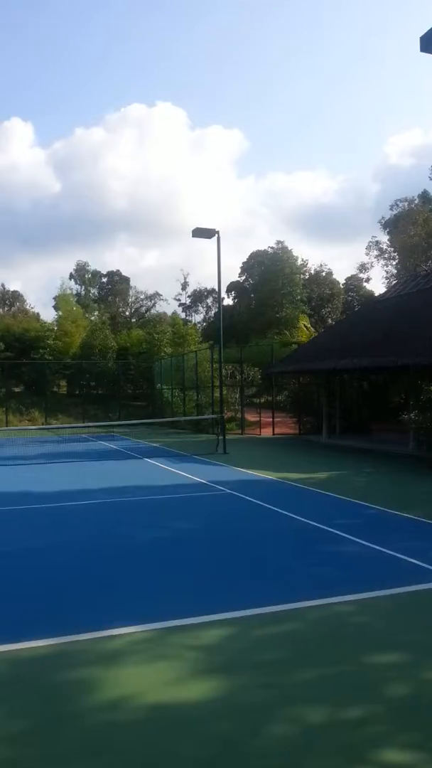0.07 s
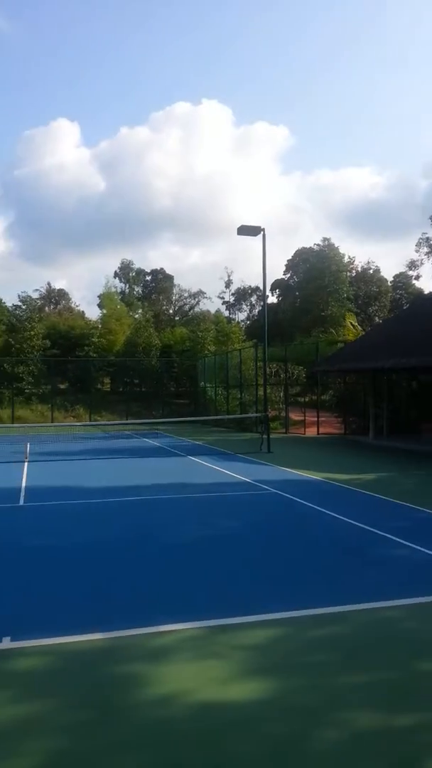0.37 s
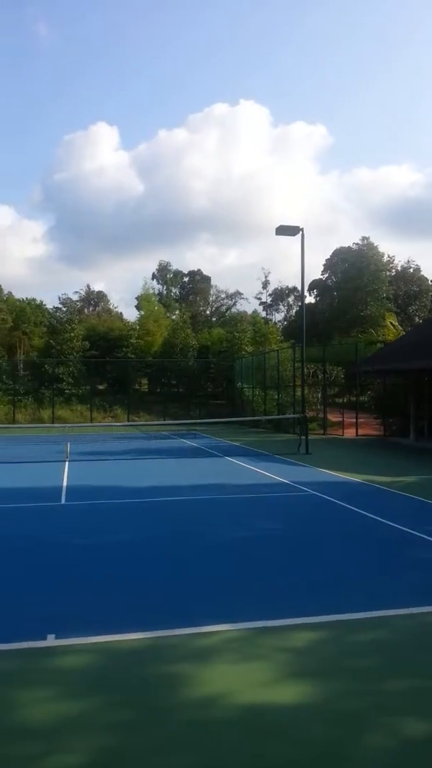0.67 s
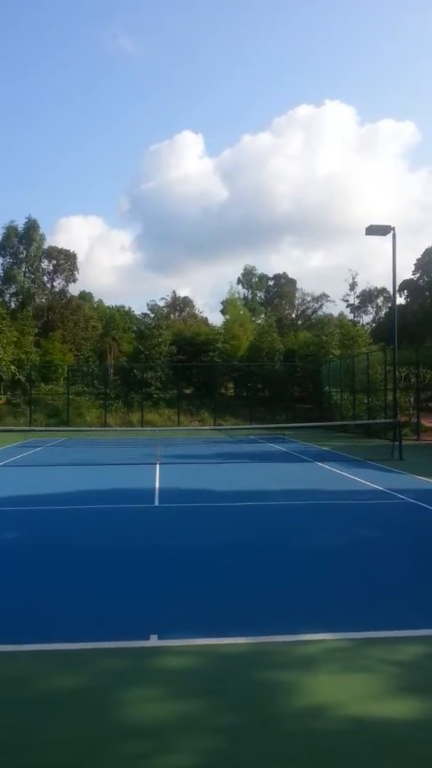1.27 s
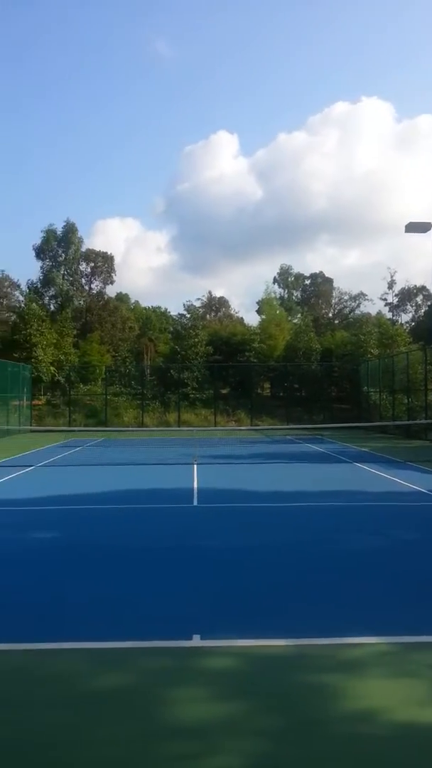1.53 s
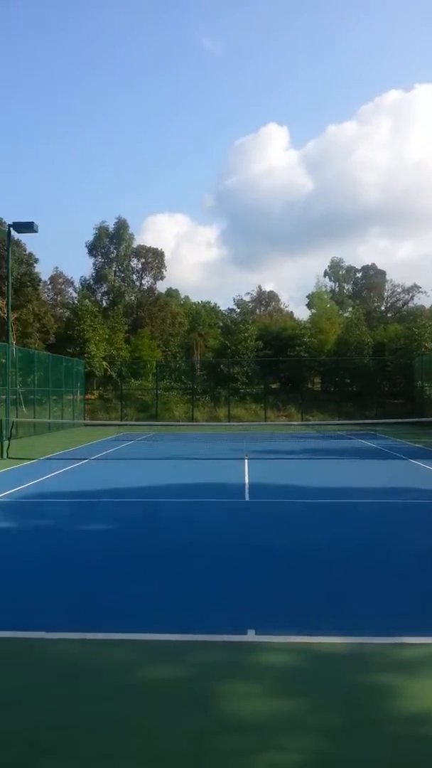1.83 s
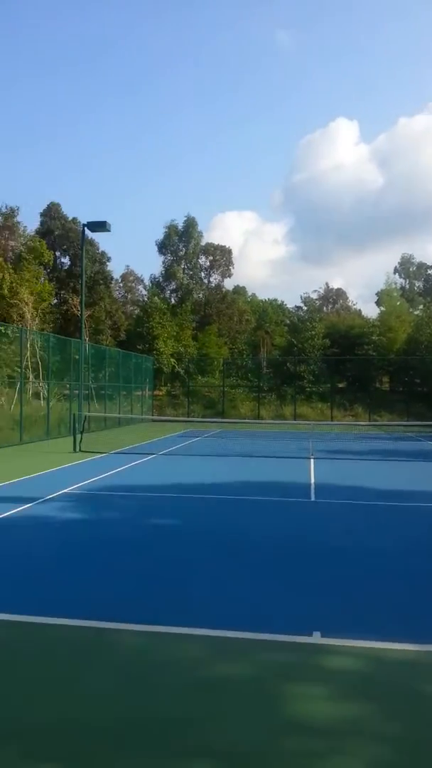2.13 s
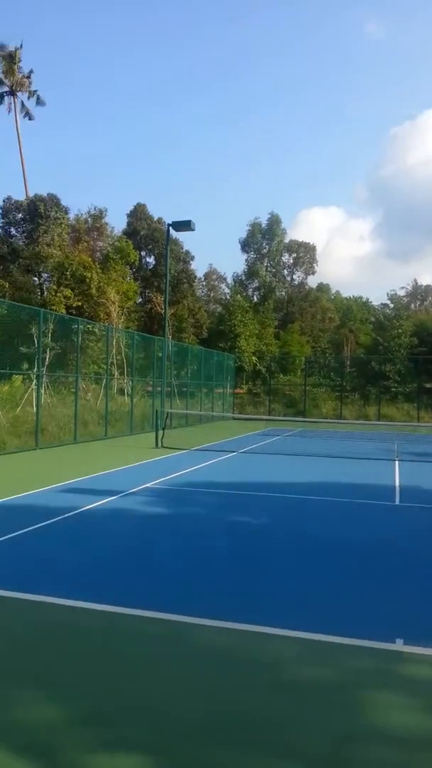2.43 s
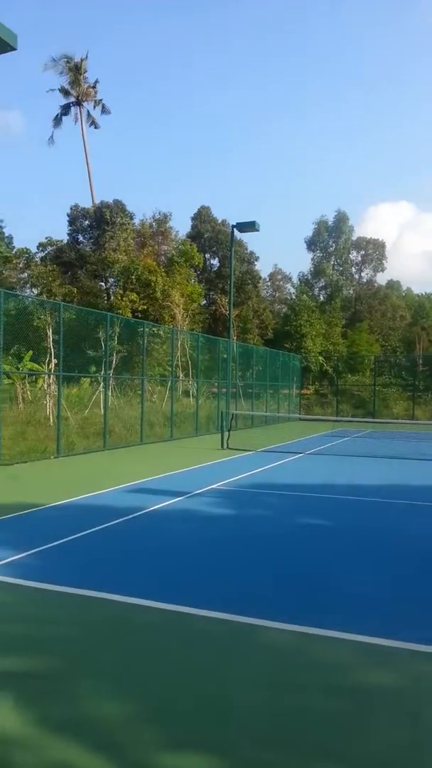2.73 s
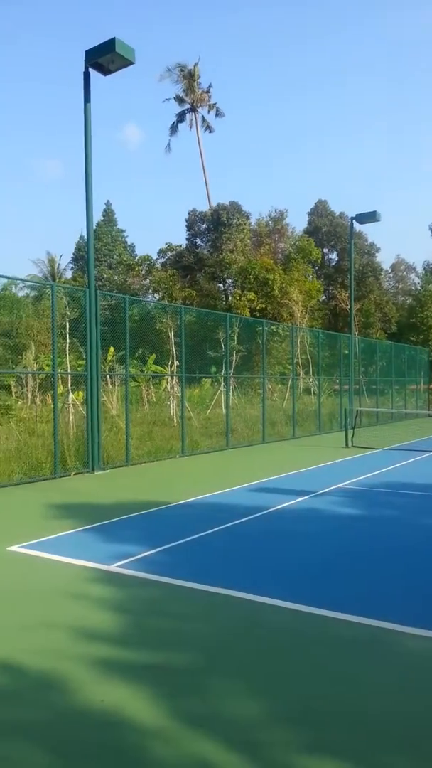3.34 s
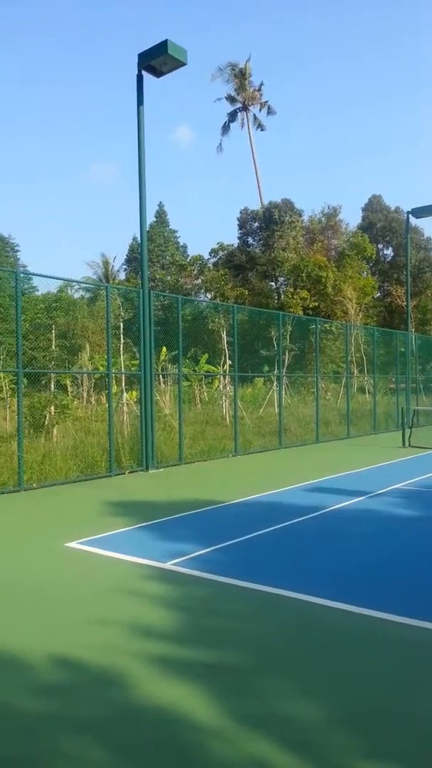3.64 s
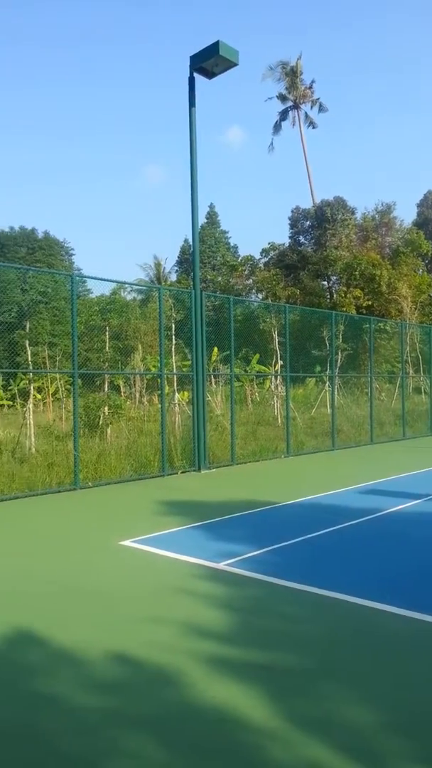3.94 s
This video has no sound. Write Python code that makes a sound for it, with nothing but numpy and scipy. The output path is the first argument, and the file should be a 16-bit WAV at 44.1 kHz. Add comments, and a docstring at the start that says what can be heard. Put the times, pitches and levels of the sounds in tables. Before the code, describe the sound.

Cicadas sing without a break around an open-air court, lower on the left and shriller on the right. Light ticks and a brief shoe scuff sound close by before one cicada rises, all over a faint hum.

```python
"""An outdoor court among trees. Cicada choruses sing, the lower ones left, the shrill ones right:
tymbal clicks ring the insects' bodies and scatter through the foliage. One closer cicada joins late,
and far insects call in waves. Close by come dry ticks, one short scuff and a few soft bumps, as of
someone turning on the spot. A faint machine hum lies under the outdoor air and the fizz of the wood."""
import sys
import numpy as np
from scipy import signal
from scipy.fft import rfft, irfft
from scipy.io import wavfile
from scipy.ndimage import uniform_filter1d, map_coordinates

SR = 44100
rng = np.random.default_rng(int(sys.argv[2]) if len(sys.argv) > 2 else 0)


def generate_wav(sig):
    """Save sig (samples, or channels by samples) to the path in sys.argv[1] as 16-bit PCM at SR."""
    pcm = np.round(np.clip(np.atleast_2d(sig).T, -1, 1) * 32767).astype(np.int16)
    wavfile.write(sys.argv[1], SR, pcm)


N = 176400
TIME, FREQ = np.arange(N) / SR, np.fft.rfftfreq(N, 1 / SR)


# Chorus voices: pitch_hz, width_hz, gain_db, left_over_right_db, coherence, left_lead_rad
DEEP_VOICE = (4461, 718, -3, 7.5, 0.25, 1.5)
LOW_VOICE = (4987, 1002, 1, 7.5, 0.16, 4)
MIDDLE_VOICE = (5480, 621, -7, 15, 0.5, 2)
UPPER_VOICE = (6105, 1700, 0.35, 1.1, 0.44, 2.16)
MAIN_VOICE = (6686, 875, 0, -14, 0.42, 3.5)
HIGH_VOICE = (7544, 829, -1.5, -9.5, 0.43, -3.5)
SHRILL_VOICE = (8522, 676, -15.5, -10, 0.7, 2)  # upper resonance of the high chorus
# Chorus swells, before the voice's gain: time_s, level_db
DEEP_SWELL = [(0, -63), (.5, -72), (.82, -62), (1.1, -65), (1.4, -64), (1.85, -75), (2.3, -77), (2.8, -61),
              (3.1, -63), (3.35, -56.5), (3.7, -59), (4, -61)]
LOW_SWELL = [(0.0, -59.5), (0.3, -55), (0.62, -55.5), (0.92, -53), (1.3, -55.5), (1.57, -52.5), (1.85, -55),
             (2.08, -52), (2.3, -51.5), (2.52, -54), (2.95, -55), (3.35, -55), (3.7, -55.5), (4.0, -51)]
MIDDLE_SWELL = [(0.0, -58), (0.33, -44.5), (0.6, -54.5), (1.0, -52), (1.5, -60), (1.85, -60), (2.25, -74),
                (2.6, -50), (2.95, -62), (3.4, -46), (3.7, -48), (4.0, -48)]
UPPER_SWELL = [(0.0, -53.5), (0.3, -55.5), (0.7, -55), (1.1, -52), (1.4, -52), (1.85, -52.5), (2.25, -50),
               (2.6, -53), (2.95, -55), (3.35, -55.5), (3.7, -52.2), (4.0, -52)]
MAIN_SWELL = [(0.0, -50.5), (0.25, -49), (0.6, -50), (1.05, -52), (1.55, -49.5), (1.8, -52), (2.2, -50.5),
              (2.55, -51.5), (3.0, -49.5), (3.5, -48.5), (4.0, -48.5)]
HIGH_SWELL = [(0.0, -56), (0.25, -52.5), (0.7, -51), (1.2, -54), (2.2, -54.5), (2.7, -55.5), (3.0, -54),
              (3.25, -50.5), (3.6, -49), (3.85, -50.5), (4.0, -48.5)]

def cicadas():
    """Choruses in the trees, each swelling and easing as a group."""
    groups = [(DEEP_SWELL, DEEP_VOICE), (LOW_SWELL, LOW_VOICE), (MIDDLE_SWELL, MIDDLE_VOICE),
              (UPPER_SWELL, UPPER_VOICE), (MAIN_SWELL, MAIN_VOICE),
              (HIGH_SWELL, HIGH_VOICE), (HIGH_SWELL, SHRILL_VOICE)]
    return sum(chorus(np.interp(TIME, *np.transpose(swell)), *voice) for swell, voice in groups)


def chorus(level_db, pitch_hz, width_hz, gain_db, lean_db, coherence, lead_rad, bend=1):
    """Tymbal clicks ring the insects' bodies; the pitch drifts slightly."""
    clicks = stereo(foliage(tymbals()), foliage(tymbals()), lean_db, coherence, lead_rad)
    ringing = irfft(clicks * resonance(pitch_hz, width_hz), N)
    position = np.cumsum(bend * (1 + 0.006 * wander(rate_hz=2.5)))
    song = np.array([map_coordinates(side, [position], order=3, mode="wrap") for side in ringing])
    return unit_rms(song) * amp(gain_db + level_db)


def tymbals(singers=10, centre_rate_hz=280, spread_db=5, throb_db=0.95):
    """Click trains of several throbbing cicadas, each at its own rate."""
    out = np.zeros(N)
    for _ in range(singers):
        pace, size = rng.uniform(-1, 1, 2)
        rate_hz = centre_rate_hz * np.exp(0.5 * pace) * (1 + 0.05 * wander(rate_hz=30))
        cycles = np.cumsum(rate_hz) / SR + rng.random()
        clicks = np.flatnonzero(np.diff(np.floor(cycles)))
        signs = np.resize(rng.choice([-1, 1], 4096), len(clicks))
        out[clicks] += signs * amp(spread_db * size + throb_db * wander(rate_hz=24)[clicks])
    return unit_rms(out)


def foliage(x, direct_share=0.45, t60_s=0.33, path_change_hz=0.601):
    """Spectrum of x arriving partly direct, partly scattered by leaves along three changing paths."""
    scattered = 0
    for offset in np.arange(3) / 3:
        tail = rng.standard_normal(N) * decay(0, t60_s)
        fading = np.sin(np.pi * (TIME * path_change_hz + offset)) * np.sqrt(2 / 3)
        scattered = scattered + rfft(x * fading) * rfft(tail / np.linalg.norm(tail))
    return np.sqrt(direct_share) * rfft(x) + np.sqrt(1 - direct_share) * scattered


# Close cicada's call: time_s, level_db, pitch_hz
CLOSE_CALL = [(0, -76, 7430), (2.8, -62, 7580), (3.25, -53.5, 7500), (3.551, -53.5, 7590),
              (3.752, -57, 7350), (4, -66, 7280)]
# Its voice: width_hz, left_over_right_db, coherence (clipped to 1), left_lead_rad
CLOSE_VOICE = (322, -11, 1.7, -3.5)

def close_cicada():
    """A narrow resonance on the right, heard as one cicada that swells late and sags in pitch."""
    time_s, level_db, pitch_hz = np.transpose(CLOSE_CALL)
    width_hz, *image = CLOSE_VOICE
    bend = np.interp(TIME, time_s, pitch_hz) / pitch_hz.mean()
    return chorus(np.interp(TIME, time_s, level_db), pitch_hz.mean(), width_hz, 0, *image, bend=bend)


# Dry ticks: start_s, body_peak_db, pitch_hz, width_hz, edge_over_body_db
TICKS = [(1.1305, -60, 1300, 2200, -20), (1.48, -49, 2000, 1600, -25), (1.4932, -38, 1670, 1500, -10),
         (1.6695, -44.5, 2500, 1900, -16), (1.6757, -32.5, 2460, 2600, -3), (1.686, -44, 2600, 2200, -4)]

def ticks(tail_db=-22.5):
    """Each snap rings a heavily damped mode, with a sharp edge and a brief crumbling tail."""
    out = np.zeros(N)
    for start_s, peak_db, pitch_hz, width_hz, edge_db in TICKS:
        tail = amp(tail_db) * rng.normal(0, 0.5, N) * decay(start_s, t60_s=0.11)
        snap = rfft(signal.unit_impulse(N, round(start_s * SR)) + tail)
        body = irfft(snap * resonance(pitch_hz, width_hz), N)
        edge = irfft(snap * resonance(pitch_hz=5900, width_hz=1700), N)
        out += amp(peak_db) * (body / abs(body).max() + amp(edge_db) * edge / abs(edge).max())
    return out


# Light touch, three quick slips, faint after-rub: centre_s, sigma_s, level_db
SLIPS = [(2.069, 0.017, -60.5), (2.085, 0.0045, -45), (2.0983, 0.0044, -40), (2.115, 0.0067, -46),
         (2.278, 0.033, -63.5)]
# Grit spectrum: freq_hz, gain_db
GRIT_SPECTRUM = [(200, -21), (850, -15), (1350, -5), (2000, -0.5), (2900, -9), (3400, -3.5), (3900, -9),
                 (4800, 2.5), (6000, -7), (7500, -16), (14000, -39)]

def scuff(grains_per_s=8800):
    """A rub that catches and slips: dense grit under a few short strokes."""
    grit = (rng.random(N) < grains_per_s / SR) * rng.choice([-1, 1], N)
    strokes = sum(amp(level_db) * np.exp(-((TIME - centre_s) / sigma_s) ** 2 / 2)
                  for centre_s, sigma_s, level_db in SLIPS)
    return strokes * unit_rms(colour(grit, GRIT_SPECTRUM))


# Soft bumps: start_s, level_db
BUMPS = [(0.84, -55.5), (1.126, -57.5), (1.488, -61), (1.508, -67), (1.657, -57), (1.671, -58),
         (1.765, -58), (2.096, -55)]
# Puff spectrum: freq_hz, gain_db
PUFF_SPECTRUM = [(25, -26), (50, 0), (85, 18), (130, -7), (330, -8), (700, -4), (1500, -17.5), (5000, -38)]

def bumps(boom_hz=83, boom_gain_db=-5, rise_s=0.0022):
    """Dull thuds in the centre: a low boom and a puff of noise."""
    out = np.zeros(N)
    puff = unit_rms(colour(rng.standard_normal(N), PUFF_SPECTRUM))
    for start_s, level_db in BUMPS:
        age_s = TIME - start_s
        attack = np.clip(age_s / rise_s, 0, 1)
        boom = amp(boom_gain_db) * np.sin(2 * np.pi * boom_hz * age_s) * decay(start_s, t60_s=0.16)
        out += amp(level_db) * attack * (boom + puff * decay(start_s, t60_s=0.12))
    return out


# Far voices: pitch_hz, width_hz, gain_db, left_over_right_db, coherence, left_lead_rad
DULL_VOICE = (3238, 1447, -7, 3.5, 0.5, 1.5)
THIN_VOICE = (3863, 322, -7, 17, -0.3, 4.5)
# Far calls, before the voice's gain: centre_s, dull_db, thin_db
FAR_CALLS = [(.05, -59.5, -64), (.67, -61.5, -63.5), (1.32, -61.5, -63), (1.95, -63, -60.5),
             (2.6, -65, -70), (3.2, -61.5, -80), (3.83, -60, -69)]

def far_insects(half_call_s=0.2, rest_db=-73):
    """Two far voices rise, hold and rest together in regular waves."""
    dull = thin = amp(rest_db)
    for centre_s, dull_db, thin_db in FAR_CALLS:
        call = np.exp(-((TIME - centre_s) / half_call_s) ** 4)
        dull = dull + amp(dull_db) * call
        thin = thin + amp(thin_db) * call
    return dull * chorus(0, *DULL_VOICE) + thin * chorus(0, *THIN_VOICE)


# Fizz of the wood and outdoor air: freq_hz, density_db
FIZZ_SPECTRUM = [(3000, -59), (6000, -17), (8400, 2.5), (9200, 2), (10400, 2), (11400, 4), (12700, 1),
                 (13400, -5.5), (14500, -6)]
AIR_SPECTRUM = [(20, -17), (50, -8), (85, -7.5), (120, -9), (200, -8.5), (260, -11), (370, -9.5),
                (600, -13.5), (1000, -18.5), (1800, -19), (2600, -17), (4000, -16), (8000, -21),
                (14500, -30.5)]
# Left-right balance of the hiss; the right side is hollow at 1-2 kHz, as in compressed audio
HISS_LEAN = [(40, 4), (250, 2), (700, 1), (1100, 12.5), (1700, 15.5), (2700, -1), (4000, -1.5),
             (8500, -3.5), (10500, -3.5), (12500, -1.5), (14000, 3)]  # freq_hz, left_over_right_db
HISS_COHERENCE = [(40, 0.38), (200, 0.73), (500, 0.76), (950, 0.13), (1400, 0.13), (1900, 0.083),
                  (3000, 0.21), (6000, 0.047), (8500, 0.25), (11000, 0.13), (14000, .1)]  # freq_hz, coherence
HISS_LEAD = [(20, 0), (250, .2), (900, .1), (1050, 3.8), (2000, 5.9), (2700, 7.6), (6000, 8.8), (8500, 9.8),
             (14000, 10)]  # freq_hz, left_lead_rad

def background_hiss(spectrum, level_db, flicker_db):
    """Wide background hiss, with a patchy flicker like that of compressed audio."""
    hz = np.fft.rfftfreq(2048, 1 / SR)
    real_a, imag_a, real_b, imag_b, flicker = rng.standard_normal((5, N // 512 + 5, len(hz)))
    flicker = uniform_filter1d(flicker, size=8, axis=0)
    flicker = unit_rms(uniform_filter1d(flicker, size=24, axis=1))
    image = [lookup(table, hz) for table in (HISS_LEAN, HISS_COHERENCE, HISS_LEAD)]
    frames = stereo(real_a + 1j * imag_a, real_b + 1j * imag_b, *image)
    frames *= amp(lookup(spectrum, hz) + flicker_db * flicker)
    _, noise = signal.istft(frames.transpose(0, 2, 1), nperseg=2048, noverlap=1536)
    return amp(level_db) * unit_rms(noise[:, :N])


# Machine tones: pitch_hz, level_db, left_over_right_db
HUM_TONES = [(75.6, -64.5, -3), (170.1, -72, -1), (235.8, -91, -7), (302.5, -83, 2), (374.7, -82.5, -7.5),
             (487, -86, 2)]

def machine_hum(pitch_drift=0.00475, waver_db=0.72):
    """Low machine tones that waver slightly in pitch and level."""
    out = np.zeros((2, N))
    for pitch_hz, level_db, lean_db in HUM_TONES:
        cycles = np.cumsum(pitch_hz * (1 + pitch_drift * wander(rate_hz=4.26))) / SR
        tone = unit_rms(np.sin(2 * np.pi * (cycles + rng.random())))
        pan = amp([[lean_db / 2], [-lean_db / 2]])
        out += tone * amp(level_db + waver_db * wander(rate_hz=6.1)) * pan
    return out


def amp(db):
    """Decibels to gain."""
    return 10 ** (np.asarray(db) / 20)


def unit_rms(x):
    """Scales to rms 1."""
    return x / np.sqrt(np.mean(x ** 2) + 1e-30)


def lookup(table, hz):
    """Interpolates a table on a log-frequency axis."""
    freq_hz, value = np.transpose(table)
    return np.interp(np.log(hz + 1), np.log(freq_hz + 1), value)


def colour(x, spectrum):
    """Filters by rows of freq_hz, gain_db."""
    return irfft(rfft(x) * amp(lookup(spectrum, FREQ)), N)


def wander(rate_hz):
    """Slow random curve of rms 1."""
    hz = np.fft.rfftfreq(2048, N / SR / 2048)
    slow = irfft(rfft(rng.standard_normal(2048)) * np.exp(-(hz / rate_hz) ** 2))
    return np.interp(TIME, np.linspace(0, N / SR, len(slow)), unit_rms(slow))


def decay(start_s, t60_s):
    """Exponential envelope from start_s on."""
    return (TIME >= start_s) * amp(-60 * np.maximum(TIME - start_s, 0) / t60_s)


def resonance(pitch_hz, width_hz):
    """Steep-sided response: three equal band-pass stages, each width_hz wide."""
    stage = 1j * FREQ * width_hz / (pitch_hz ** 2 - FREQ ** 2 + 1j * FREQ * width_hz)
    return stage ** 3


def stereo(a, b, lean_db, coherence, lead_rad):
    """Mixes two unrelated spectra into left and right; positive lean_db favours the left."""
    coherence, left_gain = np.clip(coherence, -1, 1), amp(lean_db)
    right = (coherence * a + np.sqrt(1 - coherence ** 2) * b) * np.exp(-1j * lead_rad)
    return np.array([left_gain * a, right]) / np.sqrt((1 + left_gain ** 2) / 2)


def from_left(x, lean_db=8, lag_s=0.00046):
    """A sound on the left reaches the right side later and weaker."""
    return np.array([x, amp(-lean_db) * np.interp(TIME - lag_s, TIME, x)])


def scene():
    """Insects, small near sounds, air and hum."""
    insects = cicadas() + close_cicada() + far_insects()
    fizz = background_hiss(FIZZ_SPECTRUM, level_db=-61.5, flicker_db=1.5)
    near = from_left(ticks() + scuff()) + bumps()
    air = background_hiss(AIR_SPECTRUM, level_db=-63, flicker_db=2.5)
    return insects + near + fizz + air + machine_hum()


def record(dry, cutoff_hz=14450):
    """Steep low-pass band limit."""
    lowpass = signal.firwin(511, cutoff_hz, window=("kaiser", 9), fs=SR)
    return signal.oaconvolve(dry, lowpass[None], "same")


dry = scene()
out = record(dry)
generate_wav(out)
```